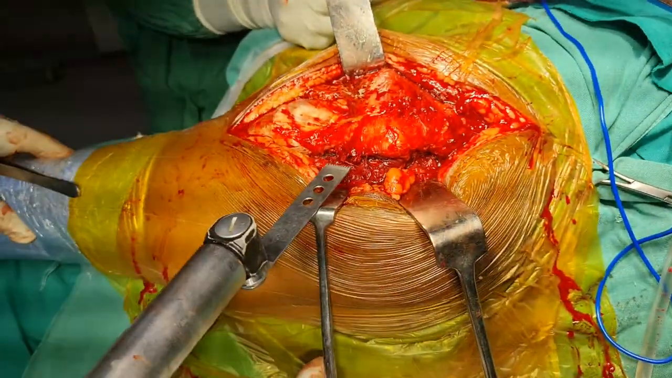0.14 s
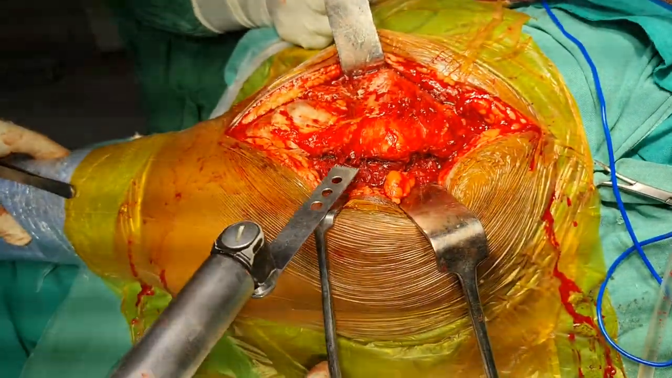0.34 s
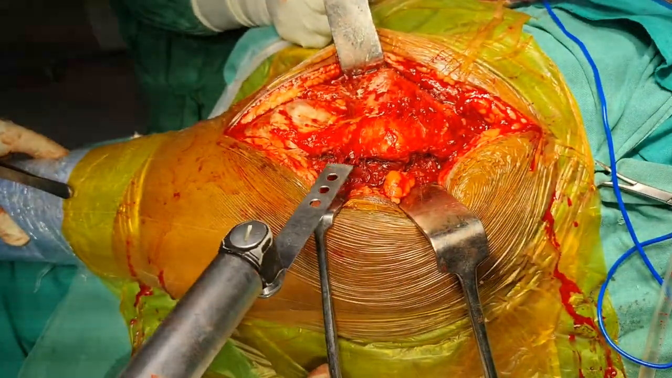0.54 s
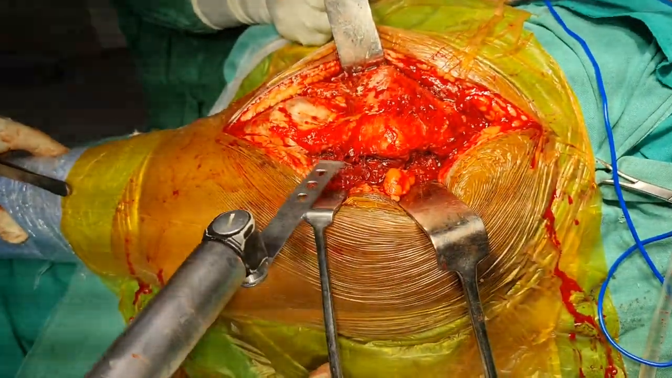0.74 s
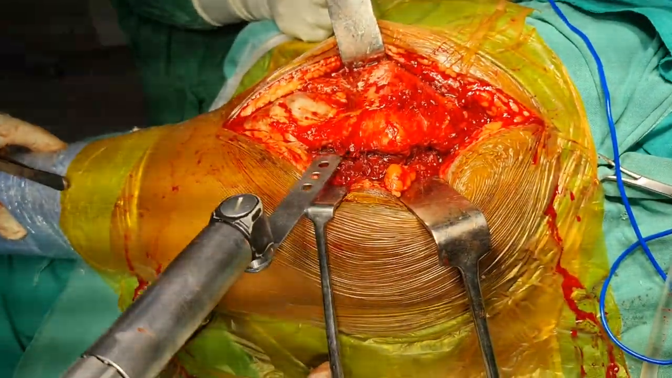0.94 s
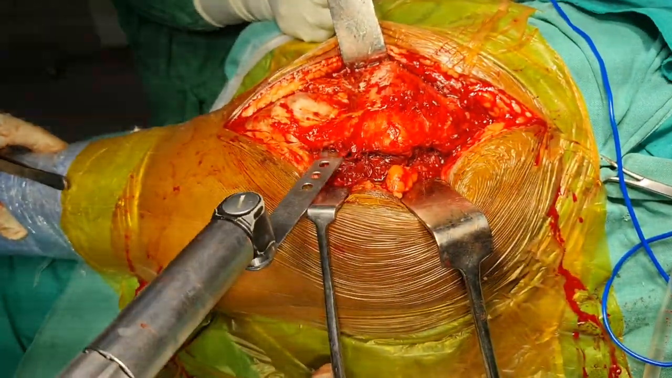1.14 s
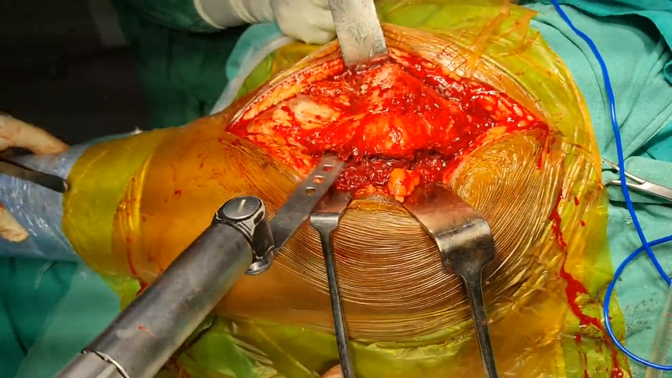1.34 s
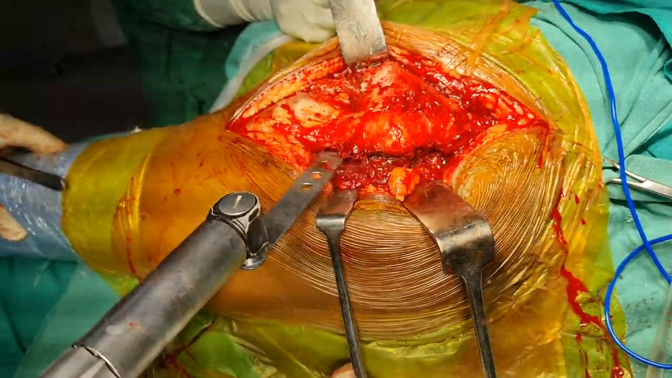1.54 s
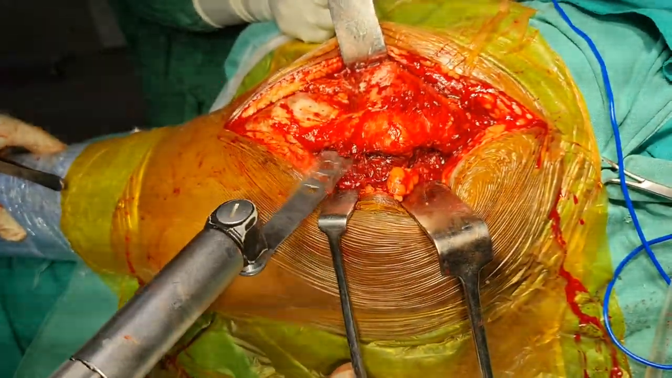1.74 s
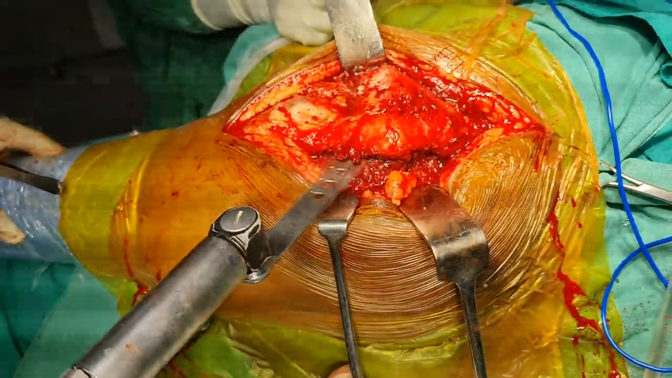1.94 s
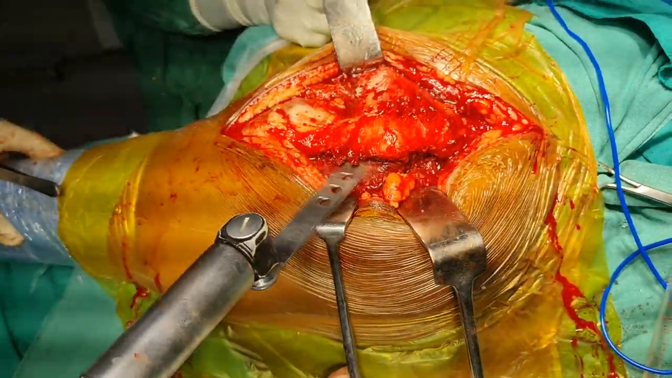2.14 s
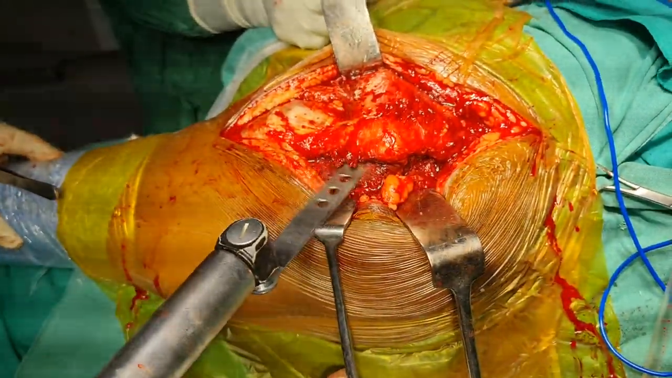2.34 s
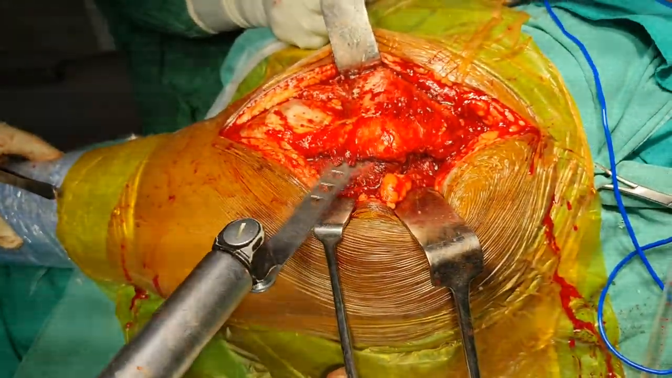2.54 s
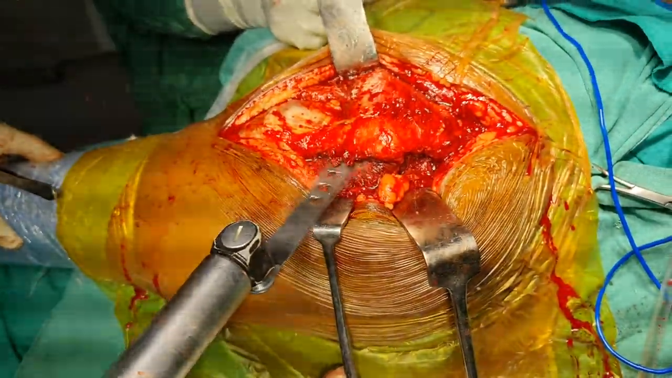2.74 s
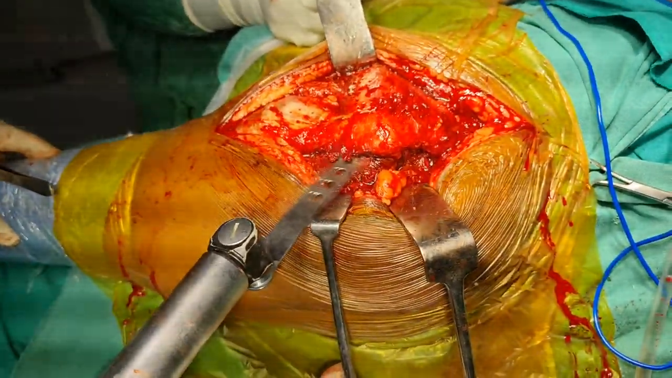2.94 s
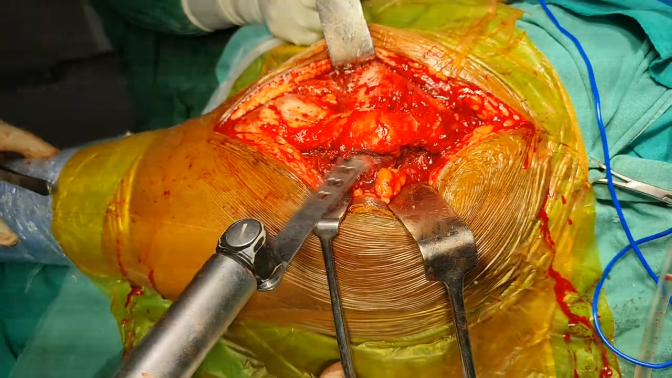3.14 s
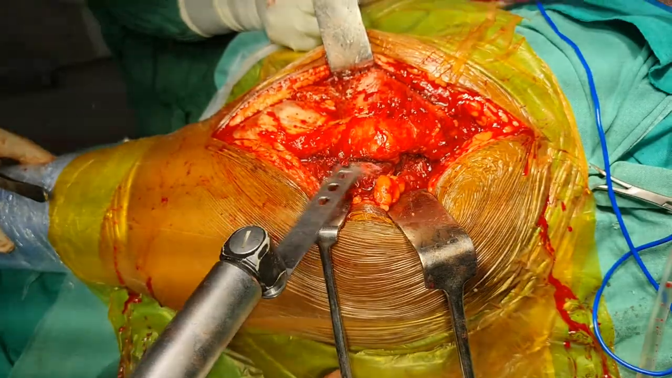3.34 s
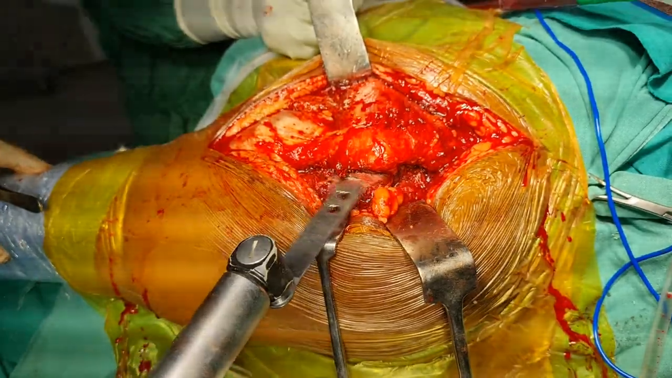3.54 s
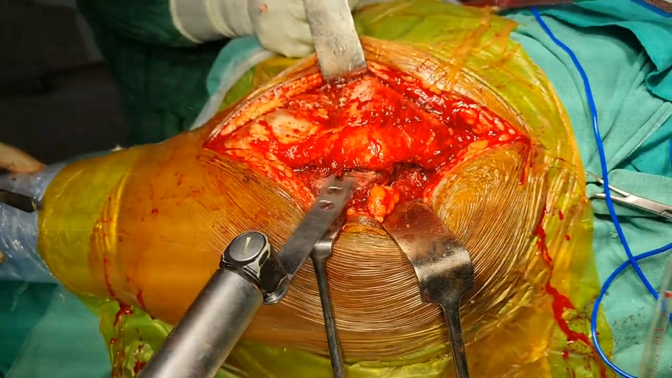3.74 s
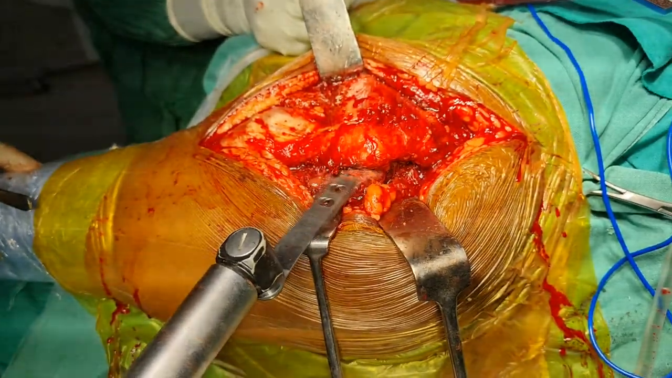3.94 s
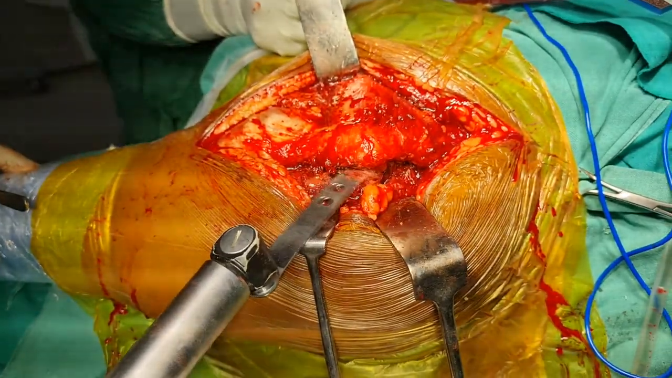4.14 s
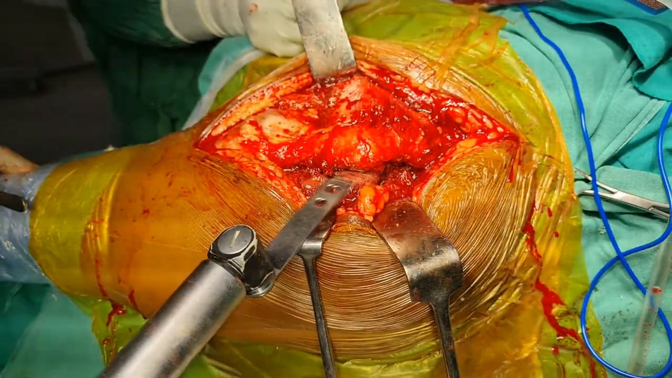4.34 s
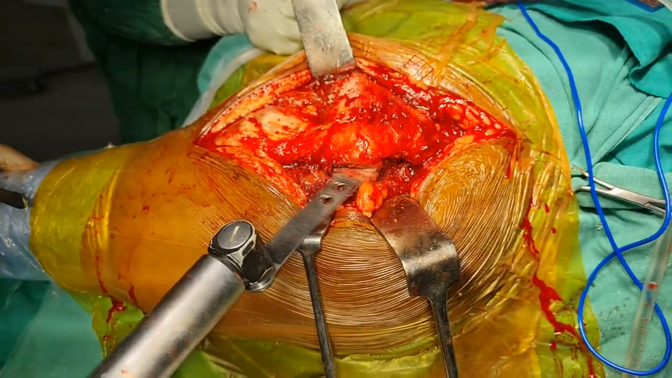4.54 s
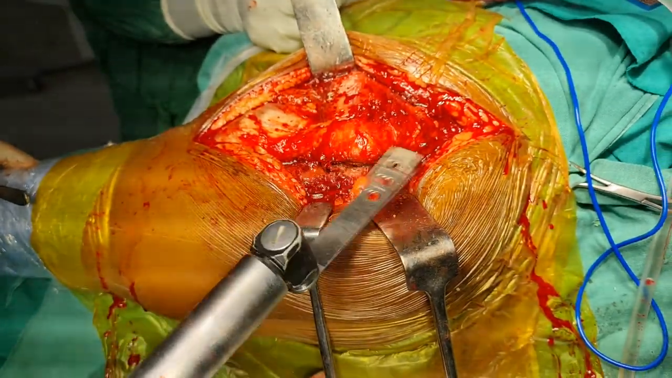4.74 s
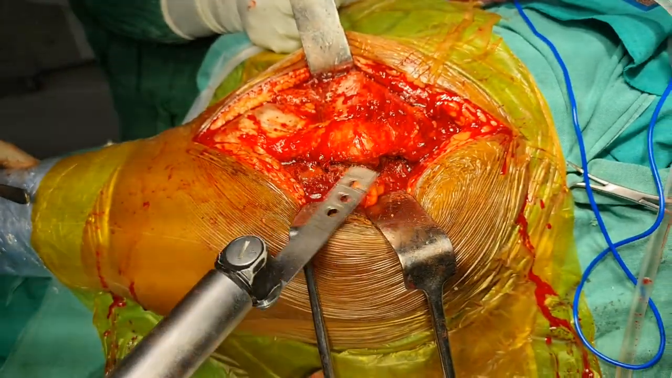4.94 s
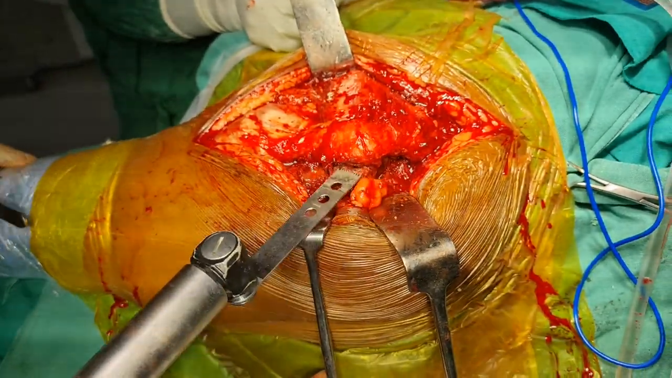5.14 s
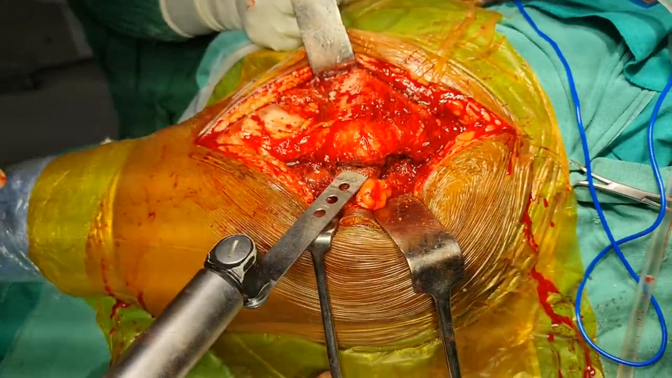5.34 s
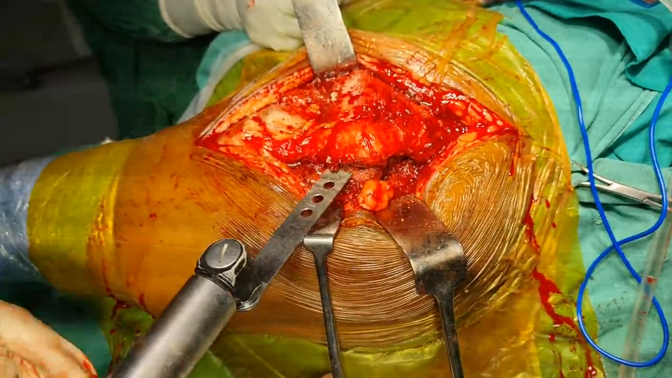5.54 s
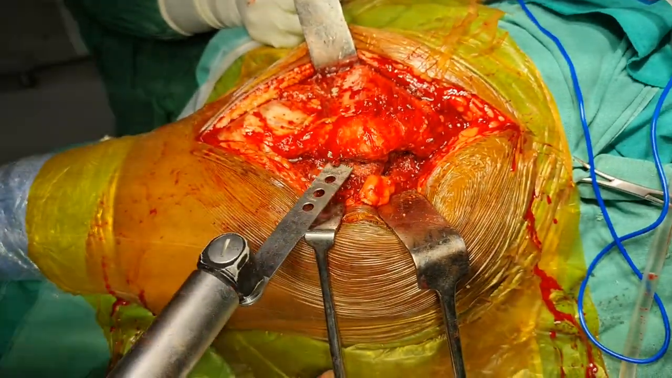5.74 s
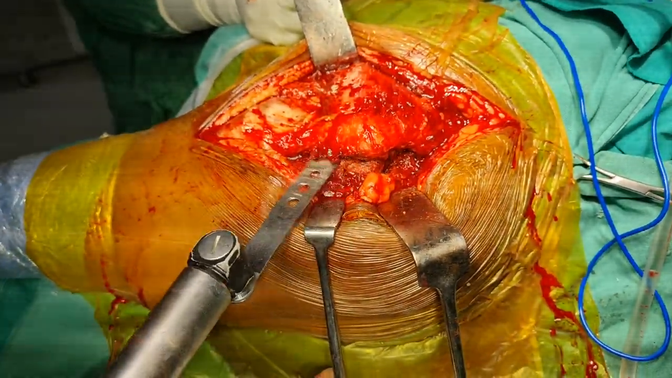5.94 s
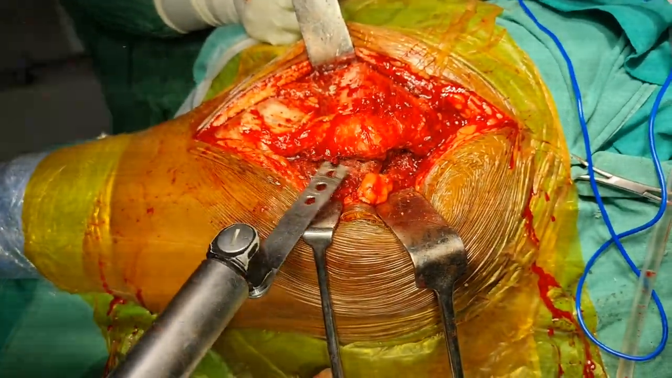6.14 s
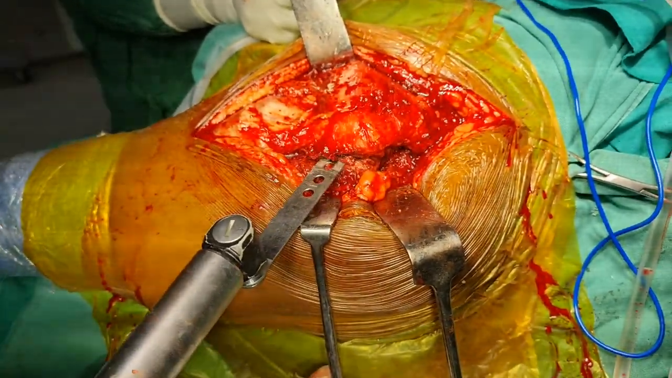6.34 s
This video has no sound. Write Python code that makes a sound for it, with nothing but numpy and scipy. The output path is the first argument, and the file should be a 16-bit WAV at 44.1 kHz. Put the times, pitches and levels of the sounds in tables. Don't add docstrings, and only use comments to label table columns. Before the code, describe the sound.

In a hard-walled operating room, an oscillating surgical saw starts low, runs up and buzzes through bone, stops, then spurts briefly and knocks against bone.

```python
import sys
import numpy as np
from scipy import signal
from scipy.fft import rfft, irfft, next_fast_len
from scipy.io import wavfile
from scipy.ndimage import uniform_filter1d, map_coordinates

SR = 44100
rng = np.random.default_rng(int(sys.argv[2]) if len(sys.argv) > 2 else 0)


def field_ratio(decibels):
    return 10 ** (np.asarray(decibels, dtype=float) / 20)


def wrap_up_sound(samples):
    columns = np.atleast_2d(samples).T
    tamed = np.clip(columns, -1, 1)
    steps = np.round(tamed * 32767).astype(np.int16)
    wavfile.write(sys.argv[1], SR, steps)


N = 286209
TIME = np.arange(N) / SR


def unit(x):
    return x / np.sqrt(np.mean(x ** 2) + 1e-20)


def along(points, hz):
    f, v = np.transpose(points)
    return np.interp(np.log(hz + 1), np.log(f + 1), v)


def curves(rows):
    s, *cols = np.transpose(rows)
    return [np.interp(TIME, s, c) for c in cols]


def running(table, stop_s):
    a, b = table[0][0], table[-1][0]
    return np.interp(TIME, [a - stop_s, a, b, b + stop_s], [0, 1, 1, 0])


def wobble(rate):
    knots = rng.standard_normal(int(N * rate / SR) + 4)
    return map_coordinates(knots, [np.arange(N) * rate / SR])


def filtered(x, response):
    m = next_fast_len(N + SR // 2)
    return irfft(rfft(x, m) * response(np.fft.rfftfreq(m, 1 / SR)), m)[..., :N]


def coloured(x, spectrum, spread_s):
    hz = np.fft.rfftfreq(2048, 1 / SR)
    delay_s = spread_s * np.repeat(rng.random(129), 8)[:len(hz)]
    phase = -2j * np.pi * np.cumsum(delay_s + 64 / SR) * hz[1]
    taps = irfft(field_ratio(along(spectrum, hz)) * np.exp(phase))
    taps = taps[None] / np.linalg.norm(taps)
    return signal.oaconvolve(np.atleast_2d(x), taps, axes=1)[:, 64:N + 64]


def patchy(x, depth_db):
    z = signal.stft(x, nperseg=512)[2]
    field = uniform_filter1d(rng.standard_normal(z.shape[1:]), 4, 0)
    field = uniform_filter1d(field, 24, 1)
    return signal.istft(z * field_ratio(depth_db * unit(field)), nperseg=512)[1][:, :N]


# f/Hz, density/dB
VENT = [(12, -51.5), (20, -24.5), (48, -4.5), (262, -4), (347, -6.5), (574, -8.5), (642, -13),
        (1260, -14.5), (1400, -11.5), (1860, -19), (2670, -20.5), (10200, -40.5), (13500, -43),
        (16000, -59.5)]
# f/Hz, correlation/1
VENT_ALIKE = [(60, 0.98), (240, 0.9), (950, -0.33), (3770, -0.063), (15000, 0.34)]


def ventilation():
    def mid_side(hz):
        angle = np.arccos(np.clip(along(VENT_ALIKE, hz), -1, 1)) / 2
        return field_ratio(along(VENT, hz)) * [np.cos(angle), np.sin(angle)]

    mid, side = filtered(rng.standard_normal((2, N)), mid_side)
    air_db = -52 + 1.5 + 1.3 * wobble(5)
    return field_ratio(air_db) * unit(np.array([mid + side, mid - side]))


# t/s, peak level/dB
TICKS = [(0.0004, -18), (0.012, -38.5), (0.0464, -42), (0.0734, -42.5), (0.134, -45.5), (0.1396, -45.5),
         (0.2404, -50.5), (0.3144, -35.5), (5.5402, -41), (5.6327, -39.5), (5.8902, -39), (5.913, -51),
         (5.9326, -23.5), (6.333, -32.5), (6.3674, -33.5), (6.4713, -25)]


def ticks():
    out, t = np.zeros(N + 2000), np.arange(2000) / SR
    t60_s = 0.013
    for s, db in TICKS:
        grit = np.convolve(rng.standard_normal(2002), [.6, .3, -.9], "valid")
        out[round(s * SR):][:2000] += field_ratio(db - 9.0 - 60 * t / t60_s) * grit
    return out[:N]


# t/s, stroke f/Hz, effort level/dB, free-edge level/dB
START = [
    (.53, 79.3, -52, -20),
    (.64, 82.56, -31.5, -7.5),
    (.8, 100.1, -26.5, -5.5),
    (1.13, 105.3, -26.5, -1.5),
    (1.42, 94.07, -26, -13),
    (1.56, 103, -23.5, -9),
    (1.66, 119.9, -17.5, -12.5),
    (1.74, 209.8, -14, -7.5),
    (1.79, 247.7, -19, -8),
]
# t/s, stroke f/Hz, effort level/dB, free-edge level/dB
CUT = [
    (1.83, 248.7, -21, -5.5),
    (2.11, 252.1, -21, -7.5),
    (2.55, 247.5, -23.5, -4.5),
    (2.84, 244.5, -28.5, 2),
    (3.1, 239.6, -25.5, -8),
    (3.35, 244, -23.5, -7.5),
    (4, 248.6, -22.5, -5.5),
    (4.67, 254.3, -22.5, -9),
    (4.929, 258.5, -22, -9),
]
# t/s, stroke f/Hz, effort level/dB, free-edge level/dB
BURST = [
    (5.9, 69.9, -55.5, -13),
    (5.99, 124.9, -30.5, -7.5),
    (6.01, 165.1, -17, -20.5),
    (6.03, 203.6, -14, -17),
    (6.06, 251, -23, -4),
    (6.098, 243.5, -27, -7),
    (6.127, 226.8, -43.5, -2.5),
]
# t/s, drag f/Hz, length t/s
PUSHES = [
    (3.234, 5.2, 0.058),
    (3.62, 8.9, 0.12),
    (3.85, 6.9, .09),
    (4.169, 11, .07),
    (4.422, 12, 0.072),
    (4.569, 4, .06),
]


def motor():
    hz, effort_db, edge_db = curves(START + CUT + BURST)
    sag = sum(drag * np.exp(-((TIME - s) / length) ** 2) for s, drag, length in PUSHES)
    return hz - sag + 0.7 * wobble(30), effort_db, edge_db


def full_speed(hz):
    return np.clip((hz - 110) / 120, 0, 1)


def trigger():
    begin, end = START[0][0], CUT[-1][0]
    brake_s = .035
    long_run = np.interp(TIME, [begin - .005, begin, end, end + brake_s], [0, 1, 1, 0])
    return long_run + running(BURST, stop_s=.015)


def strokes(turns, hz, jitter, size_db):
    whole = np.arange(1, int(turns[-1]))
    chance = rng.standard_normal((len(whole), 2))
    at = np.interp(whole + jitter * chance[:, 0], turns, np.arange(N))
    index = np.floor(at)[:, None].astype(int) + np.arange(-7, 9)
    gap = index - at[:, None]
    shape = np.sinc(gap) * np.cos(gap * np.pi / 18) ** 2
    shape = shape * field_ratio(size_db * chance[:, 1:])
    return np.bincount(np.clip(index, 0, N - 1).ravel(), shape.ravel(), N) * np.sqrt(SR / hz)


def drive(noisy, gate, grit, beat):
    return np.sqrt(1 - noisy) * beat + np.sqrt(noisy) * gate * grit


# f/Hz, density/dB
GROWL = [(180, -44), (300, -18.5), (354, -29), (411, -20.5), (732, 1), (890, -7.5), (1220, 2.5),
         (1800, -23), (2340, -30), (3960, -120)]


def growl(push, effort_db, speed, buried_db):
    level_db = effort_db - 11 + speed * (-6 + 0.6 * buried_db)
    level_db = level_db + 2.5 * wobble(8)
    return field_ratio(level_db) * coloured(push, GROWL, spread_s=0.003145)


# f/Hz, density/dB
BODY = [(820, -31.5), (1400, -3), (1520, -1.5), (1590, -20.5), (1690, -5.5), (1970, -2.5), (2090, -16.5),
        (2190, -1.5), (2370, -7), (2820, 3.5), (3090, -1.5), (4860, 2.5), (8500, -10), (11000, -31),
        (18700, -120)]
# f/Hz, density/dB
IDLE_BODY = [(900, -35), (1400, -11.5), (2200, -9), (2800, -5.5), (3350, 0.5), (3900, -5.5), (4700, -5.5),
             (6100, -4.5), (7400, -15), (8500, -16.5), (11000, -27), (18000, -120)]


def casing(push, effort_db, speed):
    fast = speed * coloured(push, BODY, spread_s=0.004074)
    slow = (1 - speed) * coloured(push, IDLE_BODY, spread_s=.005)
    return field_ratio(effort_db) * patchy(fast + slow, depth_db=1.4)


# f/Hz, density/dB
TEETH = [(5500, -39.5), (7500, -6), (8500, -0.5), (9700, -5.5), (11000, -2), (12500, 0.5), (14300, 0),
         (16000, 1)]


def teeth(share, gate, beat, level_db):
    common, left, right = rng.standard_normal((3, N))
    spray = np.sqrt(.6) * common + np.sqrt(.4) * np.array([left, right])
    rasp = coloured(drive(share ** 0.36, gate, spray, beat), TEETH, spread_s=0.001984)
    return field_ratio(level_db + 3.0 + 0.58 * wobble(14)) * patchy(rasp, depth_db=2.0)


# multiple/1, level over effort/dB, mode f/Hz, width f/Hz
ORDERS_ON_MODES = [(15, -3, 1215, 14), (13, -17, 1240, 18), (5, -23, 530, 50), (6, -18, 690, 48),
                   (7, -8.5, 722, 16), (3, -2.5, 742, 30), (4, -26, 380, 20), (4, -5, 1015, 13),
                   (5, -4, 1222, 18.6), (6, -10.5, 1480, 40), (7, -11.5, 1715, 25), (8, -1.5, 1910, 6.8),
                   (9, -15, 2210, 30), (12, -13, 2925, 25), (14, -19, 3530, 30), (15, -14, 3660, 30),
                   (20, -19, 4900, 50)]


def sung(hz, turns, flutter_db, drift_db):
    unrest = flutter_db * wobble(30) + drift_db * wobble(3.974)
    total = 0
    for row, (k, db, mode, width) in enumerate(ORDERS_ON_MODES):
        order = round(k)
        level = field_ratio(db + np.roll(unrest, 21000 * row)) / np.hypot(1, (order * hz - mode) / width)
        total = total + level * np.sin(2 * np.pi * order * turns + order ** 2)
    return total


def whine(hz, turns, effort_db, speed, buried_db, looseness):
    contact_s = 1.2
    resting = np.clip((TIME - contact_s) / .12 + 1, .15, 1)
    sink_db = 2.2 * np.clip(TIME - CUT[0][0], 0, 2)
    first_db = np.minimum(effort_db, -21) - 24 + 0.5 * speed - sink_db
    first = resting * field_ratio(first_db)
    second = first * speed * field_ratio(4.5 + 2.95 * wobble(6)) * np.sin(4 * np.pi * turns)
    steady = np.clip(1 - 0.44 * looseness, 0, 1)
    sing_db = np.minimum(effort_db, -20) + 0.43 * speed * buried_db
    singing = steady * field_ratio(sing_db) * sung(hz, turns, flutter_db=2.0, drift_db=1.0)
    return first * np.sin(2 * np.pi * turns) + second + singing


# middle t/s, length t/s, level/dB, tooth spray level/dB
SLAPS = [(0.597, 0.096, -51, 1), (1.033, .076, -24, -1), (1.165, 0.03, -34, 4), (1.283, 0.072, -32, 3.5),
         (1.6, 0.069, -32, 1), (1.701, .09, -25, -2.5), (2.65, 0.046, -53, 4.5), (3.87, 0.033, -53, -4),
         (4.631, 0.024, -33.5, 8), (4.81, .26, -47.5, -0.3), (4.707, 0.032, -34, 6.5),
         (4.93, .025, -29.5, 4), (4.962, .015, -45, 11.5), (6.048, 0.1, -22, -1)]


def slaps():
    fits = [field_ratio(-6.5 * (2 * (TIME - s) / length) ** 6) for s, length, *_ in SLAPS]
    gain = sum(field_ratio(row[2]) * f for row, f in zip(SLAPS, fits))
    spray_db = sum(row[3] * f for row, f in zip(SLAPS, fits))
    return gain, spray_db, sum(fits)


# f/Hz, width f/Hz, level/dB
BLADE = [(705, 95, 3.5), (1174, 280, 3), (2800, 1900, -7.5), (3870, 290, -13)]


def blade(hz):
    ring = 0
    for k, (c, w, db) in enumerate(BLADE):
        ring = ring + (-1) ** k * field_ratio(db) * 1j * hz * w / (c * c - hz * hz + 1j * hz * w)
    return ring * (1j * hz / (500 + 1j * hz)) ** 2


def rattle(turns, hz, slap, effort_db, speed):
    loose = strokes(turns, hz, jitter=.008, size_db=1.8)
    play = field_ratio(-57) * (1 - speed) * field_ratio(effort_db + 15)
    return (slap + play) * field_ratio(16) * filtered(loose, blade)


def saw():
    hz, effort_db, edge_db = motor()
    turns, speed = np.cumsum(hz) / SR, full_speed(hz)
    buried_db = np.clip(-6 - edge_db, -8, 2.5)
    slap, spray_db, looseness = slaps()
    share = 0.69 + (.2 - 0.69) * speed + 0.26 * looseness + .022 * speed * buried_db
    share = np.clip(share, 0, 1)
    gate_db = 2 * np.cos(2 * np.pi * turns - .8) + 2.8 * np.cos(4 * np.pi * turns)
    gate = unit(field_ratio(gate_db + 3.45 * wobble(900)))
    beat = strokes(turns, hz, jitter=.001, size_db=.8)
    shaky = strokes(turns, hz, jitter=.0035, size_db=.8)
    low_push = drive(share ** 2, gate, rng.standard_normal(N), beat)
    push = drive(share * (1 - .6 * speed), gate, rng.standard_normal(N), shaky)
    rough = growl(low_push, effort_db, speed, buried_db) + casing(push, effort_db, speed)
    rough = rough + teeth(share, gate, shaky, effort_db + edge_db + spray_db)
    orders = whine(hz, turns, effort_db, speed, buried_db, looseness)
    on = trigger()
    return rough * on, -rattle(turns, hz, slap, effort_db, speed) * on, orders * on


# t/s, peak level/dB
BUMPS = [(1.63, -58), (1.721, -58), (1.721, -56), (2.108, -53.5), (2.286, -62), (2.559, -50.5),
         (2.724, -56.5), (3.086, -57), (3.499, -60), (3.59, -70), (3.757, -55), (3.94, -54), (4.097, -57),
         (4.437, -55), (4.627, -43), (4.907, -45.5)]


def bumps():
    out, t = np.zeros(N + 6000), np.arange(6000) / SR
    for (s, db), hz in zip(BUMPS, rng.uniform(26, 55, (len(BUMPS), 1))):
        out[round(s * SR):][:6000] += field_ratio(db + 8 - 60 * t / 0.16) * np.sin(2 * np.pi * hz * t)
    return out[:N] * field_ratio([[3], [-12]])


# t/s, f/Hz
WHISTLE = [(5.5, 11000), (5.52, 12300), (5.57, 13400), (5.59, 12400), (5.655, 13500), (5.72, 11900),
           (5.8, 11900), (5.86, 11600)]


def suction():
    hz, = curves(WHISTLE)
    tone = np.sin(2 * np.pi * np.cumsum(hz + 60 * wobble(150)) / SR)
    return field_ratio(-75 + 3 * wobble(60)) * tone * running(WHISTLE, stop_s=.02)


# t/s, peak level/dB, edge level/dB
KNOCKS = [
    (6.117, -14, -21.5),
    (6.177, -18, -14.5),
    (6.219, -19.5, -26),
    (6.31, -29, -19),
    (6.45, -33.5, -9.5),
    (6.482, -20, -31),
]


def knocks():
    edge, blows, t = np.zeros(N + 2000), np.zeros(N), np.arange(2000) / SR
    for s, db, edge_db in KNOCKS:
        blows[round(s * SR)] = field_ratio(db + 24.5)
        scrape = np.diff(rng.standard_normal(2001))
        edge[round(s * SR):][:2000] += field_ratio(db + edge_db - 60 * t / 0.0071) * scrape
    return edge[:N] + filtered(blows, blade)


# f/Hz, T60 t/s
THEATRE = [(300, 0.75), (1000, 0.93), (3000, 0.94), (7000, 0.68), (14000, 0.31)]
# f/Hz, level/dB
ECHO = [(200, 1), (700, 1), (1500, -0.5), (4000, -6), (9000, -2.5), (15000, -0.5)]


def theatre(x):
    noise = rng.standard_normal((2, 3 * SR // 4))
    hz, t, z = signal.stft(noise, SR, nperseg=256)
    fade = field_ratio(-60 * t / along(THEATRE, hz)[:, None])
    fade = fade / np.sqrt(np.sum(fade ** 2, axis=1, keepdims=True) * 128)
    tail = signal.istft(z * fade * field_ratio(along(ECHO, hz))[:, None], SR, nperseg=256)[1]
    return signal.fftconvolve(np.pad(x, (300, 0))[None], tail, axes=1)[:, :N]


# f/Hz, level/dB
LEAN = [(60, -2.5), (110, -1.5), (200, -7.5), (380, 10), (700, -8.5), (1290, -12.5), (2380, -17.5),
        (4400, 2), (8120, 6.5), (15000, 1.5)]
# left delay t/s, right delay t/s, level/dB
WALLS = [(.0021, .0034, -12.5), (.0047, 0.0065, -2.5), (.0068, 0.0071, -3), (0.0125, .0092, -8),
         (0.0143, .0154, -8.5)]


def ports(hz):
    lead_s = 13 / SR
    lead = np.pi * hz * lead_s * hz ** 4 / (hz ** 4 + 1000 ** 4)
    direct = [field_ratio(way * along(LEAN, hz) / 2) * np.exp(way * 1j * lead) for way in (1, -1)]
    bright = hz / (hz + 4000)
    walls = 0
    for left, right, db in WALLS:
        walls = walls + field_ratio(db) * np.exp(-2j * np.pi * hz * np.array([[left], [right]]))
    return direct * (1 + bright * walls)


def ducking():
    recover_s, opening_s = 0.54, 0.88
    loud = full_speed(curves(START + CUT + BURST)[0]) * trigger()
    keep = np.exp(-1 / (recover_s * SR))
    held = np.maximum(loud, signal.lfilter([1 - keep], [1, -keep], loud))
    return 4.5 * np.exp(-TIME / opening_s) - 8.5 * held


def scene():
    rough, rattling, orders = saw()
    hits = rattling + ticks() + knocks() + suction()
    duck_db = ducking()
    gain = field_ratio(0.32 * duck_db)
    sent = rough[0] + field_ratio(-11) * hits + field_ratio(-19) * orders
    direct = filtered(rough + orders + hits, ports)
    return direct + gain * theatre(sent / gain) + field_ratio(duck_db) * ventilation() + bumps()


def roll_off(x):
    return signal.sosfilt(signal.butter(12, 16760, fs=SR, output="sos"), x)


def record(dry):
    hiss = field_ratio(-76.5) * rng.standard_normal(dry.shape)
    edge_hz = 15870
    wet = filtered(dry + hiss, lambda hz: np.where(hz < edge_hz, 1, field_ratio(-50)))
    mix = wet / (1 + np.abs(wet) ** 6) ** (1 / 6)
    return roll_off(mix)


dry = scene()
out = record(dry)
wrap_up_sound(out)
```